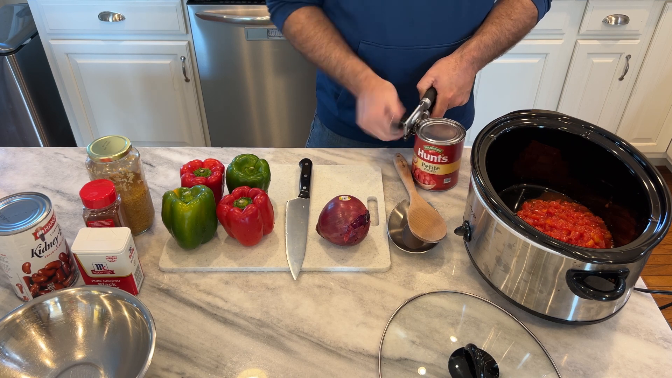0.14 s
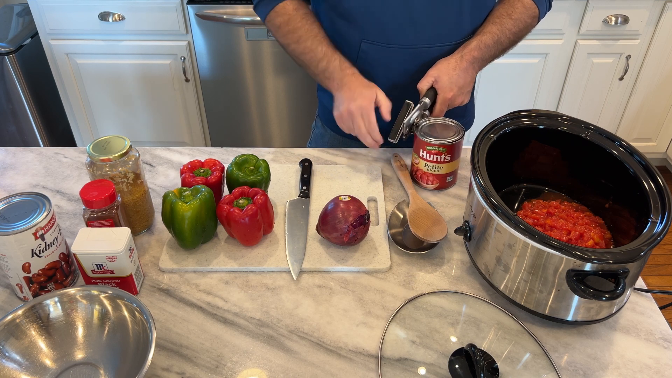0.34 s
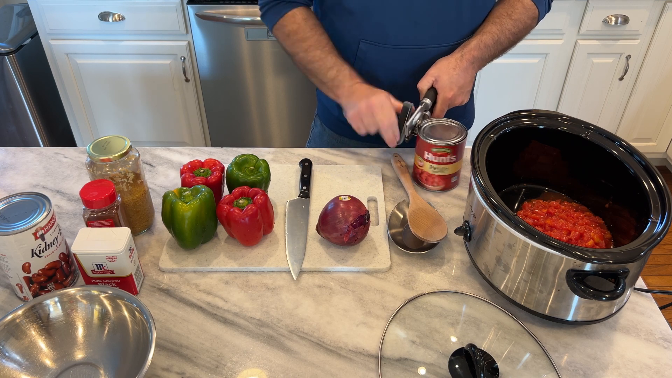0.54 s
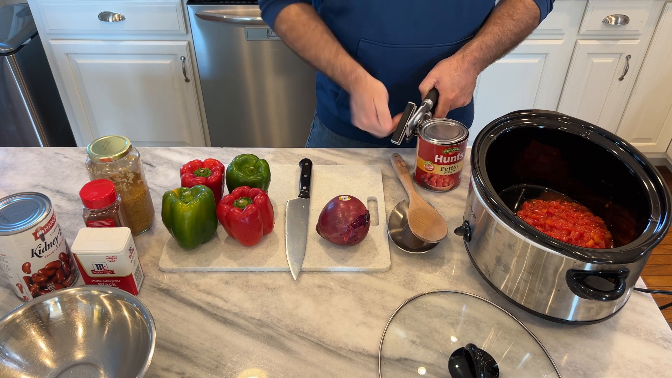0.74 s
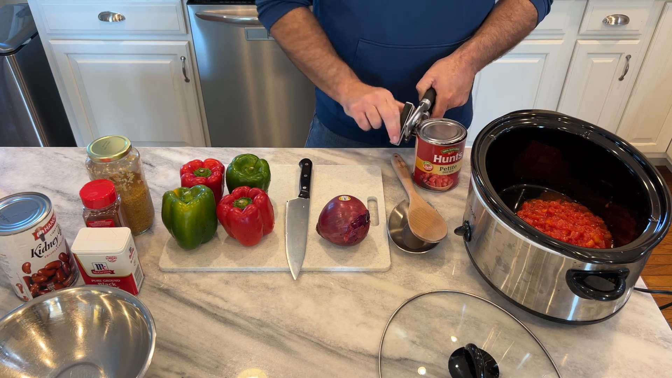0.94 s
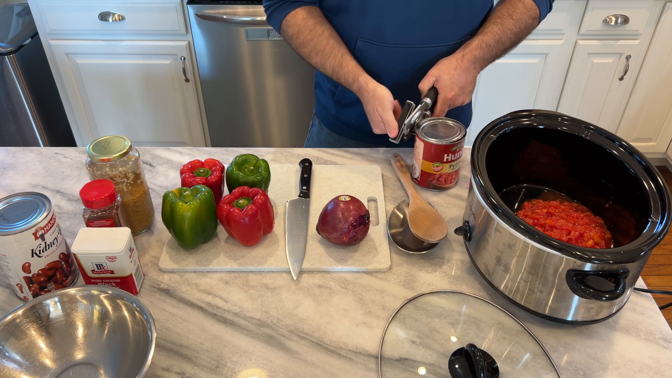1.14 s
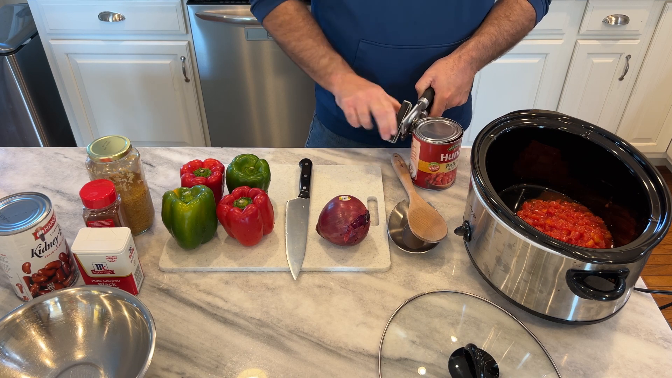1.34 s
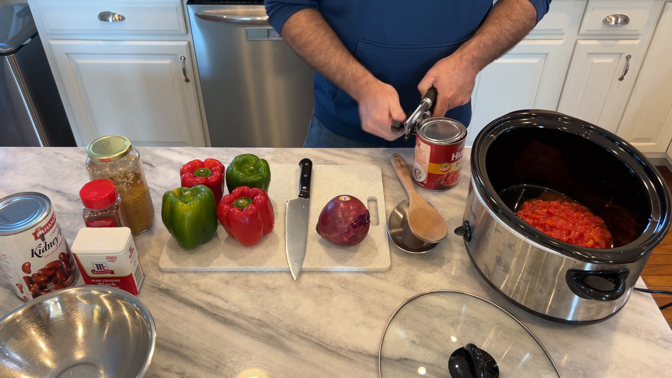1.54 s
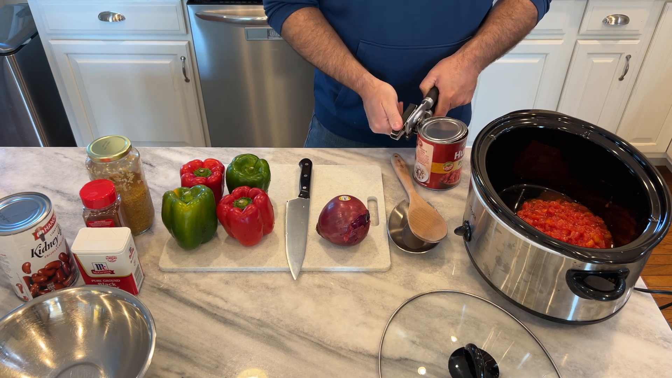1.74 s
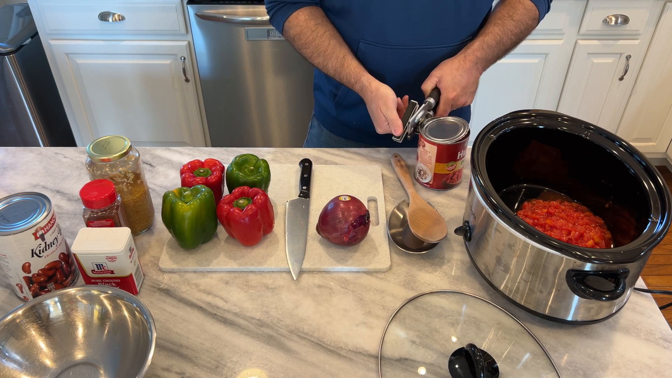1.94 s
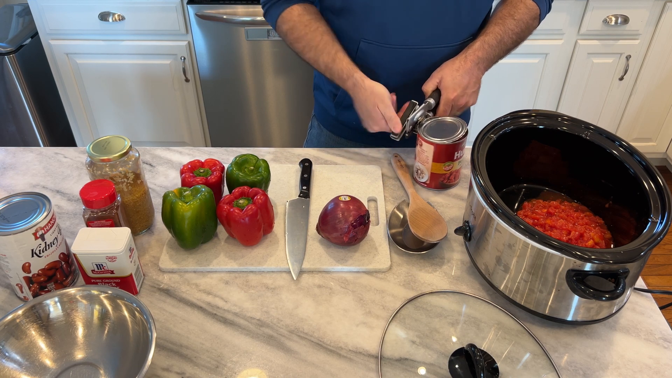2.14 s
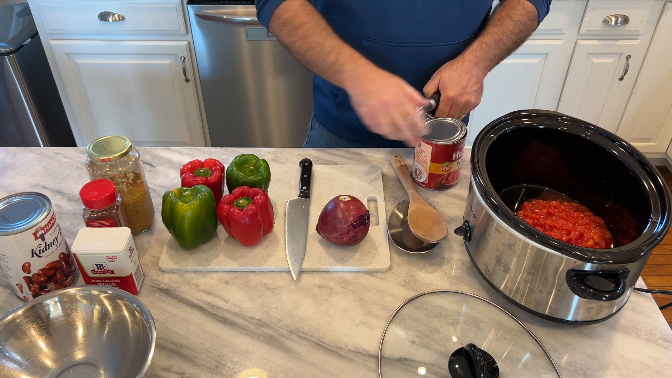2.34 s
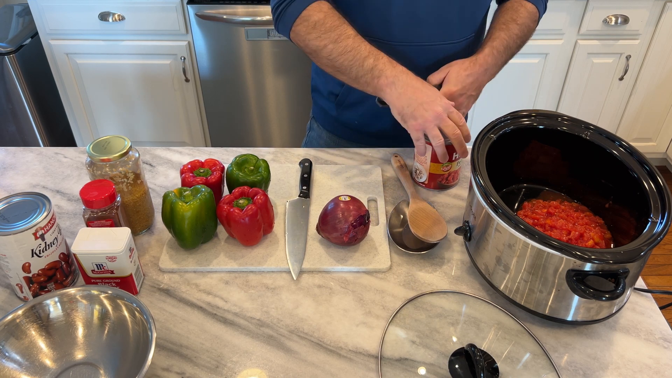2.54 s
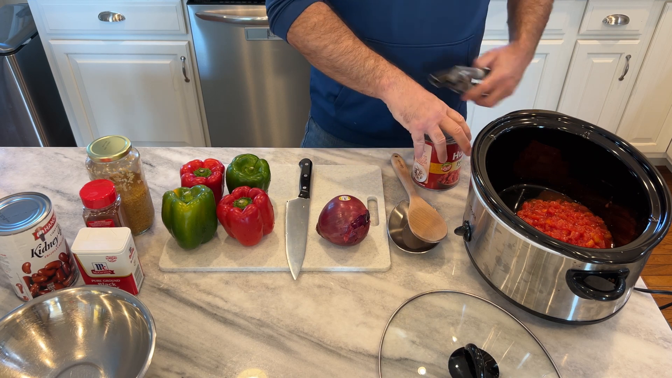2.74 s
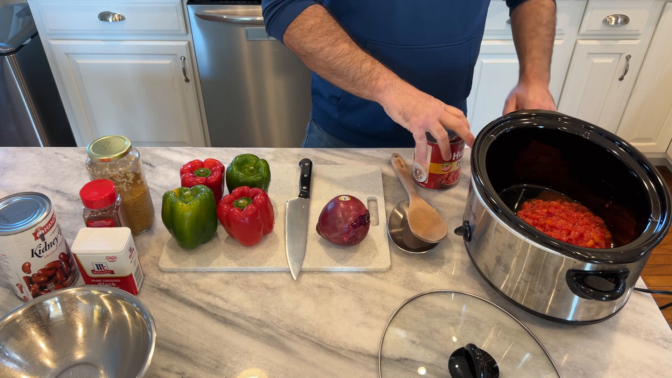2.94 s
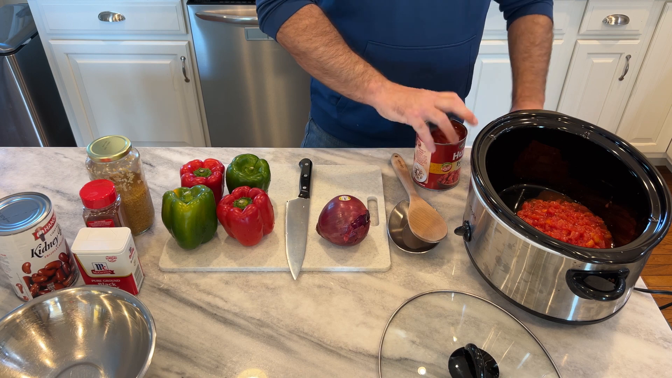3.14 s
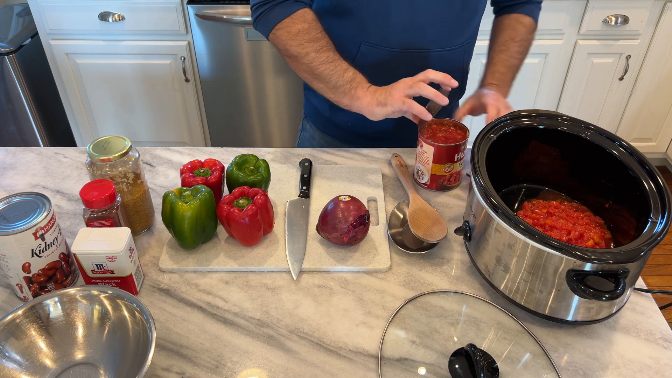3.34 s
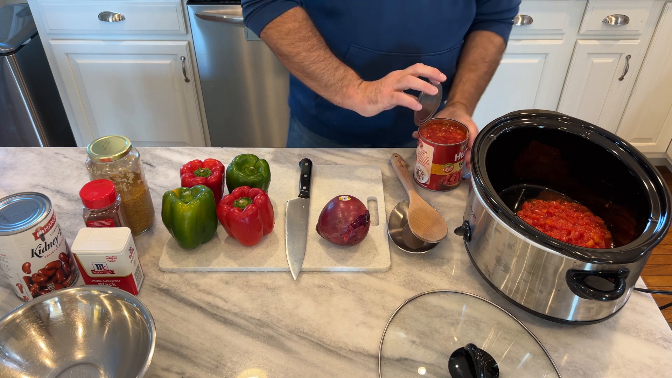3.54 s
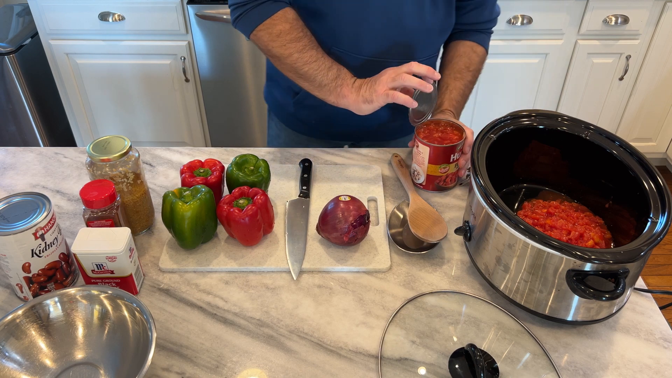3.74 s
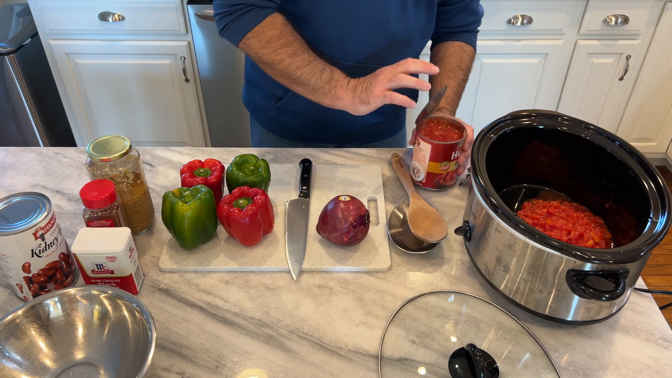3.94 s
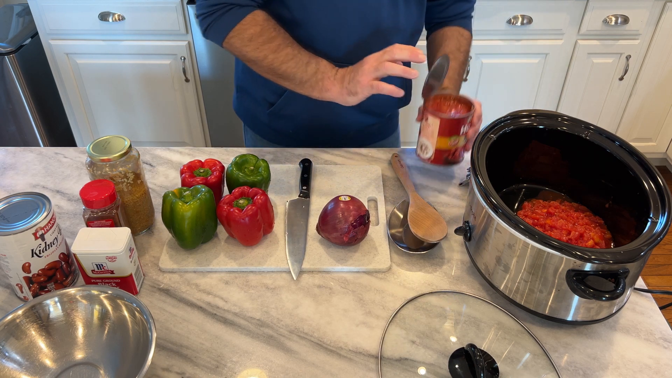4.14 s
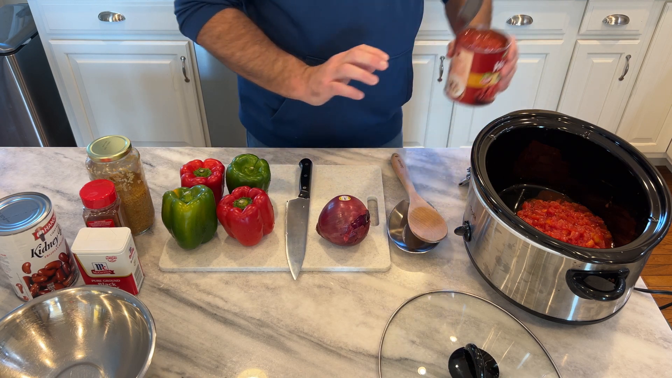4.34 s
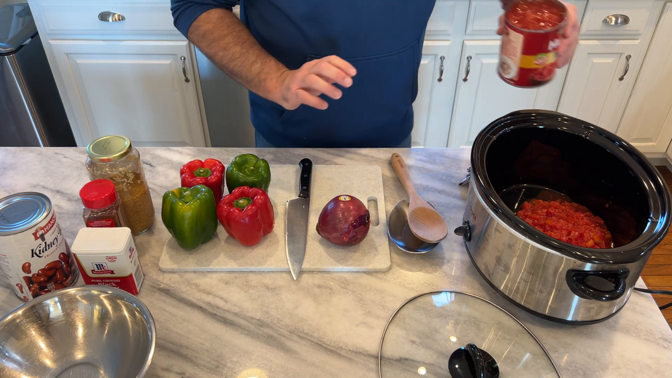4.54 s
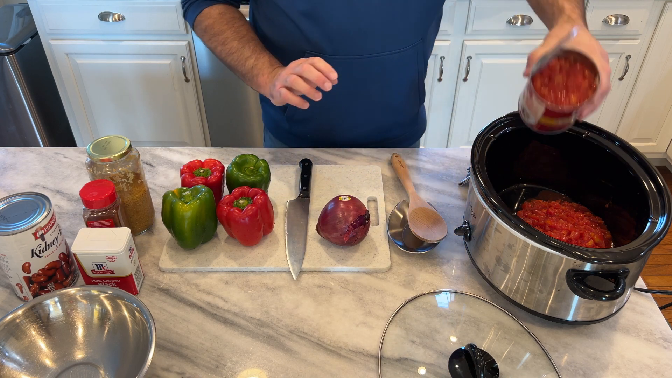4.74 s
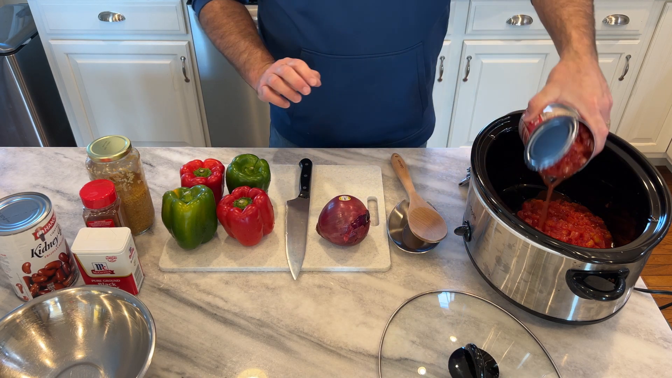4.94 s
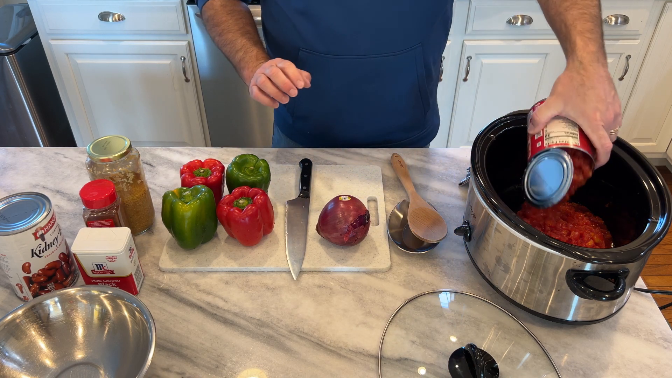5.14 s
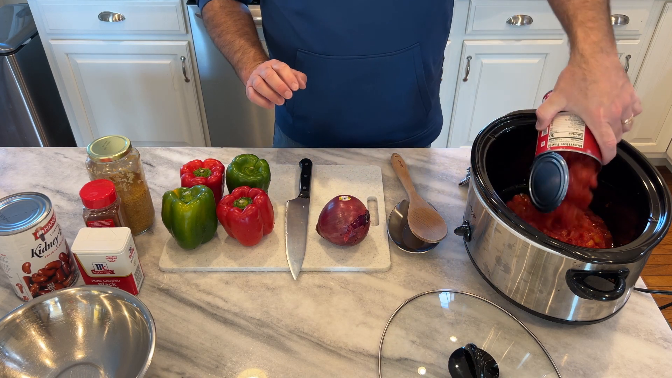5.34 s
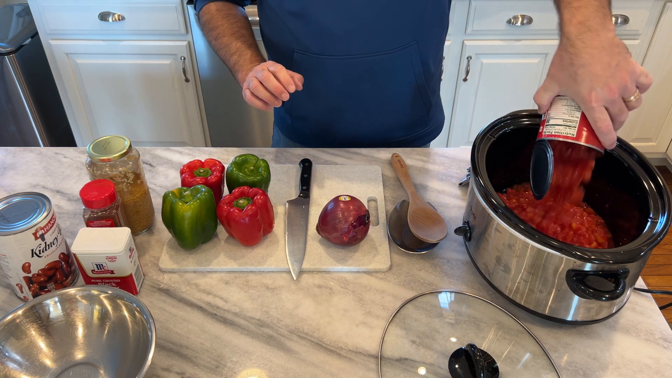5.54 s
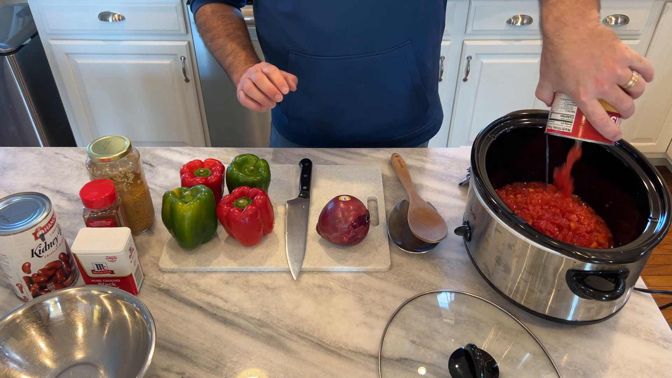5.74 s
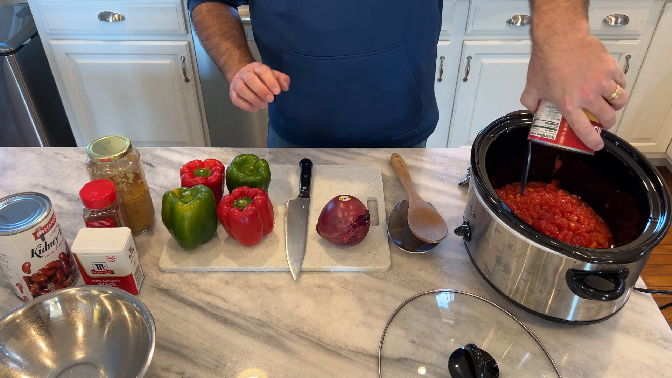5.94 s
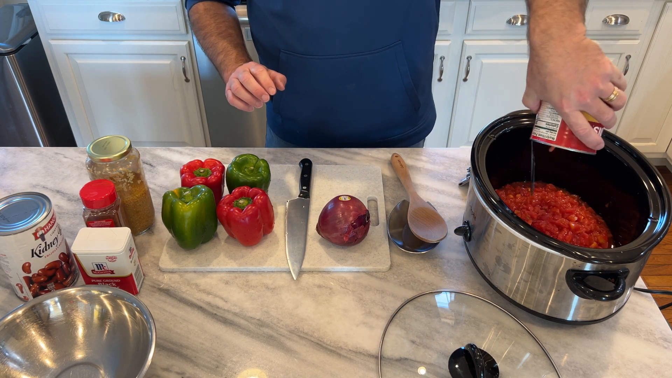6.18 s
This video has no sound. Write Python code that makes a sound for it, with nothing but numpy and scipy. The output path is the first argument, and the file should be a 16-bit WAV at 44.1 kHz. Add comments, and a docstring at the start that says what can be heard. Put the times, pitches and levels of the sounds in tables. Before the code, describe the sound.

Close in a hard, echoing kitchen, a manual opener bites around a full steel can about every half second, with short dull metallic clanks, scrapes and counter thuds. After a last sharp knock and a brief pause, the tool clatters onto stone. A dull drawer-like knock follows, then a low rolling rumble. Finally diced tomatoes plop and slop wetly into a pot, over faint room tone.

```python
"""Metallic bites and scrapes come first: a hand-crank opener bites four times round a full steel can's lid.
The opener clatters down, a drawer-like knock and low rumble follow, then diced tomatoes slop into a pot.
Dying sines make the metal and counter, random clicks the scraping and wet fizz, filtered noise the rest.
A hard kitchen rings for about half a second; two close microphone ports hear it."""
import sys
import numpy as np
from scipy import signal
from scipy.fft import rfft, irfft, next_fast_len
from scipy.io import wavfile
from scipy.ndimage import uniform_filter1d

SR = 44100
rng = np.random.default_rng(int(sys.argv[2]) if len(sys.argv) > 2 else 0)


def bounce(signal):
    """Save signal as a 16-bit WAV file at the path given by the first command-line argument."""
    frames = np.transpose(np.atleast_2d(signal))
    limited = np.clip(frames, -1, 1)
    pcm = np.round(limited * 32767).astype(np.int16)
    wavfile.write(sys.argv[1], SR, pcm)


N = 273861  # length of the scene in samples

# All levels in the tables are relative: the mix, room and ports still shape them.
# Turns of the crank (the first is only the end of one); as the cut grows each favours other can modes:
# start_s, rise_s, hold_s, ring_db, scrape_db, counter_shake_db, favoured_hz, boost_db, second_hz, boost_db
CRANK_TURNS = [(-.06, .02, .05, -58, -59, -52, 1000, 3, 430, 3),
               (0.079, 0.033, 0.048, -31.5, -39.5, -43, 1000, 7, 647, 8.5),
               (.535, .035, 0.045, -33, -43, -42, 2390, 4, 222, 11),
               (.975, .05, 0.051, -32.5, -38, -41.5, 2370, 3, 1030, 9),
               (1.442, 0.024, .06, -43, -47, -44, 1340, 14, 320, 9)]
# Blows: the opener jolts the can, the opener clatters down, a duller knock in three contacts:
# start_s, ring_db, crack_db, thud_db, favoured_hz, brightness (dB per octave)
CAN_JOLTS = [(.036, -36, -52, -43, 740, -2), (.090, -33, -35, -54, 1000, -1),
             (.113, -31.5, -27, -37.5, 1000, -2), (.150, -27, -40, -38.5, 1000, .1),
             (.229, -24, -25, -47.5, 2370, .5), (.250, -28.5, -55, -53, 895, -3),
             (.488, -37, -42, -50, 1020, .1), (.548, -36, -44, -49, 2390, 1.2),
             (.612, -34, -48, -49, 1443, .1), (.915, -36, -43, -47, 970, -1),
             (.998, -36.5, -44, -42, 1330, -1), (1.027, -27, -27, -34.5, 1000, 1),
             (1.049, -28.5, -24, -39, 2320, .3), (1.151, -28, -30, -49.5, 2215, 2),
             (1.397, -35, -48.5, -42.5, 940, -1), (1.460, -36, -50, -58, 1220, .1),
             (1.493, -36, -43.5, -42.5, 1345, -.3), (1.880, -36, -47, -53.5, 1200, -1.5),
             (2.128, -22, -26, -41, 1240, -1.1)]
OPENER_CLATTER = [(2.955, -41, -55, -53.5, 1380, -.6), (3.043, -21, -24, -46.5, 1330, .1),
                  (3.157, -21, -23.5, -33.5, 1330, -.6), (3.237, -17.5, -21.5, -39.5, 1000, .3)]
DULL_KNOCK = [(3.627, -34, -43, -49, 690, -1.2), (3.635, -27, -24.5, -50.5, 2300, 1),
              (3.659, -16.5, -17, -38, 640, -1.2)]
# Ways the steel can rings: pitch_hz, level_db, t60_s (time to die by 60 dB)
CAN_MODES = [(223.4, -8, 0.093), (322.8, -10.5, 0.15), (423.6, -3.5, 0.088), (565, -12.5, 0.057),
             (672.5, -4, 0.063), (737, -6, 0.091), (896, 8.5, 0.017), (994, 1, 0.075), (1204, -2, 0.052),
             (1278, -5.5, 0.087), (1345, -12, 0.22), (1441.6, -2.5, 0.07), (1624, -2.5, 0.031),
             (1770, -8, 0.059), (2215, -16, 0.043), (2354, -5, 0.05), (2463, -10, 0.028),
             (2520, -21.5, 0.026), (3390, -16, 0.018)]
# Colour of the wheel on steel: pitch_hz, level_db
SCRAPE_COLOUR = [(880, 4), (1500, -19.5), (2380, -5.5), (5000, -13), (8680, -23.5), (10100, -25),
                 (13100, -17), (15900, -25), (16500, -57)]
# Ways the counter and cupboards thud: pitch_hz, level_db, t60_s
COUNTER_MODES = [(76, -10.5, 0.067), (114.5, 1.5, 0.13), (177.2, -12, 0.3), (211, -9.5, 0.044)]
# Colour of the sharpest edge of a contact: pitch_hz, level_db
CLICK_COLOUR = [(5000, -22), (9000, -5.5), (13000, 1), (16500, -2.5)]
# Swell of a low rolling rumble: start_s, rise_s, hold_s, level_db, fall_db_per_s
RUMBLE_SWELL = (3.72, .3, .83, -53, 130)


def amp(db):
    """Turns decibels into a multiplying factor."""
    return 10 ** (np.asarray(db) / 20)


def evened(x):
    """Scales a sound to an average (RMS) strength of one."""
    return x / np.sqrt(np.mean(x ** 2) + 1e-20)


def read(points, hz):
    """Reads values between (pitch, value) points, spaced by ear: on a log pitch scale."""
    f, value = np.transpose(points)
    return np.interp(np.log(hz + 1), np.log(f + 1), value)


def add(mix, start_s, sound):
    """Adds a sound into the mix at its start time, cut at the end of the scene."""
    part = mix[round(start_s * SR):][:len(sound)]
    part += sound[:len(part)]


def coloured(x, points):
    """Makes some pitches stronger than others: weights the spectrum by (Hz, dB) points."""
    size = next_fast_len(x.shape[-1])
    weight = amp(read(points, np.fft.rfftfreq(size, 1 / SR)))
    return irfft(rfft(x, size) * weight, size)[..., :x.shape[-1]]


def whitened(x):
    """Makes all pitches equally strong, keeping only their timing (phase)."""
    return irfft(np.exp(1j * np.angle(rfft(x))), len(x))


def swell(start_s, rise_s, hold_s, level_db, fall_db_per_s):
    """Gain over the whole scene: rises, holds, then dies away."""
    t = np.arange(N) / SR - start_s
    fall_db = fall_db_per_s * np.maximum(t - rise_s - hold_s, 0)
    return np.clip(t / rise_s, 0, 1) ** 2 * amp(level_db - fall_db)


def ring(modes, favoured=(), slope_db=0., scatter=0., rise_s=0.0012):
    """A struck object: dying sines, three to a mode; favoured lifts nearby modes, slope tilts per octave."""
    t, out = np.arange(SR // 4) / SR, 0
    detune = 1 + scatter * rng.standard_normal((len(modes), 3, 1))
    for (hz, db, t60_s), d in zip(modes, detune):
        lift_db = sum(b * np.exp(-(np.log2(hz / f) / 0.065) ** 2) for f, b in favoured)
        level_db = db + lift_db + slope_db * np.log2(hz / 1000)
        sines = np.sin(2 * np.pi * hz * d * t).sum(0)
        out = out + amp(level_db - 60 * t / t60_s) * sines
    out = out * (1 - np.exp(-t / rise_s))
    return out / abs(out).max()


def burst(points, fade_s):
    """A short contact: a puff of noise, even in colour before points shape it, that dies at once."""
    t = np.arange(SR // 10) / SR
    puff = rng.standard_normal(len(t)) * amp(-60 * t / fade_s)
    shaped = coloured(whitened(puff), points) * amp(-20 * t / fade_s)
    strength = np.sqrt(np.mean(amp(-120 * t / fade_s)))  # shorter puffs carry less energy
    return evened(shaped) * strength * (1 - np.exp(-t / 0.0003))


def slips(size, per_s, spread_db):
    """Sudden slips: uneven clicks at random times, a few of them large."""
    big = amp(spread_db * np.minimum(rng.exponential(1, size), 4))
    return big * rng.choice([-1, 1], size) * (rng.random(size) < per_s / SR)


def in_peaks(x, peaks):
    """Noise through fixed resonances, each passed twice for steep flanks."""
    out = 0
    for hz, width_hz, db in peaks:
        b, a = signal.iirpeak(hz, hz / width_hz, SR)
        once = signal.lfilter(b, a, x)
        out = out + amp(db) * evened(signal.lfilter(b, a, once))
    return evened(out)


def blows(rows, modes, crack, crack_fade_s, chatter_fade_s, scatter, click_db):
    """Each blow chatters briefly into the object's modes, cracks and clicks, and thuds in the counter."""
    click_per_brightness = 2.5  # brighter blows click harder: dB per unit of brightness
    out, t = np.zeros(N), np.arange(SR // 20) / SR
    for start_s, ring_db, crack_db, thud_db, favoured_hz, slope_db in rows:
        chatter = rng.standard_normal(len(t)) * amp(-60 * t / chatter_fade_s)
        chatter = irfft(np.exp(1j * np.angle(rfft(chatter))), len(t))[:len(t) // 2]  # the modes set the tone
        body = signal.fftconvolve(chatter, ring(modes, [(favoured_hz, 6.5)], slope_db, scatter))
        edge_db = crack_db + click_db + click_per_brightness * slope_db
        add(out, start_s, amp(ring_db) * body / abs(body).max())
        add(out, start_s, amp(crack_db) * burst(crack, crack_fade_s))
        add(out, start_s, amp(thud_db) * ring(COUNTER_MODES, rise_s=.005))
        add(out, start_s, amp(edge_db) * burst(CLICK_COLOUR, fade_s=0.0097))
    return out


def pips(rows, glide, fuzz, t60_at_1k_s, rise_s):
    """Short tones that may rise like a closing bubble, with a noisy skirt and perhaps a click."""
    skirt_ratio, skirt_edge_db = 1.6, -16  # pitch ratio from the tone to each edge of the skirt
    out, t = np.zeros(N), np.arange(SR // 10) / SR
    for start_s, level_db, hz, *click_db in rows:
        t60_s = t60_at_1k_s * (1000 / hz) ** .45  # smaller things ring higher and shorter
        tone = np.sin(2 * np.pi * hz * (t + glide * t ** 2)) * amp(-60 * t / t60_s)
        skirt_colour = [(hz / skirt_ratio, skirt_edge_db), (hz, 0), (hz * skirt_ratio, skirt_edge_db),
                        (hz * 4, -22)]
        skirt = burst(skirt_colour, t60_s)
        roughness = fuzz * np.clip(hz / 2400, .6, 1.3)  # low ones are rounder
        add(out, start_s, amp(level_db) * (1 - np.exp(-t / rise_s)) * (tone + roughness * skirt))
        for edge_db in click_db:
            add(out, start_s, amp(edge_db) * burst(CLICK_COLOUR, fade_s=.012))
    return out


def crank():
    """The toothed wheel slips along the rim: clicks ring the can, scrape, and shake the counter."""
    ring_fall, scrape_fall, shake_fall = 300, 499.5, 150  # dB per second
    shake_lag_s = 0.026  # the counter builds up more slowly
    out = np.zeros(N)
    teeth = evened(slips(N, per_s=200, spread_db=4))
    fine_slips = evened(slips(N, per_s=2200, spread_db=6.5))
    grit = evened(coloured(fine_slips + 0.3 * teeth, SCRAPE_COLOUR))
    for start_s, rise_s, hold_s, ring_db, scrape_db, shake_db, *favoured in CRANK_TURNS:
        effort = swell(start_s, rise_s, hold_s, ring_db, ring_fall)
        scrape = swell(start_s, rise_s, hold_s, scrape_db, scrape_fall)
        shake = swell(start_s, rise_s + shake_lag_s, hold_s, shake_db, shake_fall)
        can = ring(CAN_MODES, np.reshape(favoured, (2, 2)), scatter=0.011)
        counter = ring(COUNTER_MODES)
        out += signal.oaconvolve(effort * teeth, can / np.linalg.norm(can))[:N]
        out += scrape * grit
        out += signal.oaconvolve(shake * teeth, counter / np.linalg.norm(counter))[:N]
    return out


def jolts():
    """The opener jolts the can, which rings in its own modes."""
    return blows(CAN_JOLTS, CAN_MODES, SCRAPE_COLOUR, crack_fade_s=.012, chatter_fade_s=.015,
                 scatter=.015, click_db=-15)


def opener(noise):
    """The opener drags off the rim, clatters onto stone and brushes the lid: blows and resonant noise."""
    # Ways the opener rings: pitch_hz, level_db, t60_s
    tool_modes = [(204.1, -9.5, 0.054), (410, -7, 0.024), (754, -1.5, 0.036), (987, 0, 0.03),
                  (1260, 1, 0.024), (1370, -3, 0.024), (2350, -12, 0.02), (2770, -13, 0.02),
                  (3290, -11, .015), (4250, -12, .012), (5310, -12, .012), (6040, -5, .018),
                  (6680, -5, .018)]
    # Colour of metal on stone: pitch_hz, level_db
    stone_crack = [(290, -41.5), (500, -1.5), (1120, -21), (1310, 2), (1760, -6.5), (6100, -14.5),
                   (8930, -21), (10200, -38.5), (13400, -14.5), (16500, -56.5)]
    # The cut lid is brushed and sings: start_s, rise_s, hold_s, level_db, fall_db_per_s
    brush_swell = (2.964, 0.008, .02, -45, 700)
    # Resonances of the lid: pitch_hz, width_hz (of one pass), level_db
    lid_peaks = [(1000, 200, -4), (1370, 200, 0), (2080, 200, -8), (2710, 220, 4.5), (3550, 200, -9),
                 (4500, 2500, -8), (6760, 250, -6), (8550, 250, -6), (11000, 400, -6.5),
                 (13100, 600, -12.5)]
    # The opener drags off the rim and rings: start_s, rise_s, hold_s, level_db, fall_db_per_s
    drag_swell = (2.818, .002, .018, -49.5, 600)
    # Resonances of the dragged opener: pitch_hz, width_hz (of one pass), level_db
    jaw_peaks = [(1460, 350, 1), (3020, 400, 3.5), (3670, 450, -6), (4290, 550, -6), (5820, 400, -5),
                 (3000, 5000, 5)]
    clatter = blows(OPENER_CLATTER, tool_modes, stone_crack, crack_fade_s=0.055, chatter_fade_s=0.02,
                    scatter=0.03, click_db=-13)
    brush = swell(*brush_swell) * in_peaks(noise, lid_peaks)
    drag = swell(*drag_swell) * in_peaks(noise, jaw_peaks)
    return clatter + brush + drag


def knock():
    """A dull drawer-like knock: three contacts ring low, quickly dying modes."""
    # Ways the knocked object rings: pitch_hz, level_db, t60_s
    panel_modes = [(175, -13.5, 0.12), (315, -4, 0.15), (360, 1.5, 0.046), (416, -4, 0.031),
                   (557, 1, 0.064), (646, -0.5, 0.048), (690, 1, 0.029), (925, -7, 0.016),
                   (1428, -6, 0.014), (2300, -12, 0.015)]
    # Colour of the contact: pitch_hz, level_db
    snap_colour = [(290, -55), (500, -8.5), (710, -25.5), (1150, -5), (1480, -13), (6960, -21),
                   (10200, -27), (13200, -20), (16500, -38)]
    return blows(DULL_KNOCK, panel_modes, snap_colour, crack_fade_s=0.029, chatter_fade_s=0.0091,
                 scatter=0.03, click_db=3)


def blips(per_s, low_hz, high_hz):
    """Many small bubbles in the pulp: short rising tones at random."""
    t, out = np.arange(600) / SR, np.zeros(N)
    for hz in np.geomspace(low_hz, high_hz, 12):
        bubble = np.sin(2 * np.pi * hz * (t + 12 * t ** 2)) * np.exp(-t * hz / 7)
        out += signal.oaconvolve(slips(N, per_s / 12, spread_db=3), bubble)[:N]
    return evened(out)


def tomatoes(noise):
    """Chunks plop into the pot and air gulps into the can as rising tones, over wet fizz and bubbles."""
    # Chunks and drops land in the pot: start_s, level_db, pitch_hz, click_db
    plop_rows = [(4.929, -61.5, 5600, -67), (4.945, -55.5, 5800, -70), (5.062, -64, 6020, -43),
                 (5.085, -68.5, 3800, -65), (5.100, -58, 1950, -70), (5.113, -53, 1296, -52),
                 (5.116, -51, 1920, -65), (5.150, -58, 3450, -70), (5.184, -54, 2730, -42.5),
                 (5.240, -48, 2300, -41), (5.245, -48, 4400, -46), (5.265, -56, 4270, -40),
                 (5.317, -48, 1940, -62), (5.319, -54, 1350, -70), (5.322, -54, 2400, -70),
                 (5.359, -54, 2040, -65), (5.390, -50.5, 2830, -47), (5.420, -44.5, 1756, -61),
                 (5.421, -51, 1350, -70), (5.452, -52, 1300, -70), (5.500, -49, 1900, -65),
                 (5.551, -55, 2800, -65), (5.445, -45, 1900, -46), (5.493, -45, 2410, -39),
                 (5.555, -52, 1820, -65), (5.592, -35.5, 1260, -51), (5.594, -41, 2290, -53),
                 (5.595, -45, 3000, -60), (5.604, -45, 1900, -65), (5.630, -47, 1970, -43),
                 (5.740, -55.5, 3480, -65.5), (5.768, -48.5, 3350, -43), (5.974, -60.5, 5370, -49),
                 (6.018, -66.5, 6180, -56)]
    # Air gulps into the can: start_s, level_db, pitch_hz
    gulp_rows = [(5.365, -48.5, 466), (5.38, -50.5, 760), (5.41, -50.5, 460), (5.46, -49.5, 554),
                 (5.595, -51, 744), (5.68, -52.5, 504), (5.715, -54, 520)]
    # Strength of the wet flow over time: time_s, level_db
    flow_points = [(5.07, -79), (5.094, -66), (5.29, -62.5), (5.55, -66), (5.628, -56), (5.694, -72),
                   (5.846, -80), (6.05, -103)]
    # Colour of the wet fizz: pitch_hz, level_db
    fizz_colour = [(180, -36), (300, -8), (1130, -8), (2440, -11.5), (7020, -5.5), (10100, -27),
                   (14000, -8), (15700, -14), (16500, -41)]
    clumps = amp(6 * np.clip(evened(uniform_filter1d(noise, 700)), -2, 1.5))  # slow uneven strength
    fizz = evened(coloured(clumps * slips(N, per_s=3700, spread_db=7.5), fizz_colour))
    flow = amp(np.interp(np.arange(N) / SR, *np.transpose(flow_points), left=-200))
    plops = pips(plop_rows, glide=2.5, fuzz=1.1, t60_at_1k_s=.07, rise_s=.0008)
    gulps = pips(gulp_rows, glide=1.8, fuzz=1.8, t60_at_1k_s=.055, rise_s=.004)
    return plops + gulps + flow * (fizz + 0.5 * blips(per_s=140, low_hz=1280, high_hz=5060))


def small_sounds(noise):
    """Ticks are short pips; a rustle and a faint whisper over the rumble are high filtered noise."""
    # Small ticks of fingers and metal: start_s, level_db, pitch_hz, click_db
    tick_rows = [(1.777, -64, 2920, -73), (1.797, -63, 2800, -78), (2.377, -56, 3040, -68),
                 (2.392, -56.5, 2770, -63), (2.556, -59.5, 2005, -68), (2.733, -63.5, 6700, -75),
                 (2.810, -56.5, 1500, -53), (3.470, -78, 5800, -58), (3.889, -56, 13200, -60)]
    # A short high rustle: start_s, rise_s, hold_s, level_db, fall_db_per_s
    rustle_swell = (3.5, 0.1, 0.08, -70, 600)
    ticks = pips(tick_rows, glide=0., fuzz=0.8, t60_at_1k_s=.03, rise_s=.0005)
    hiss = evened(coloured(noise, [(5000, -36.5), (12000, -4.5), (16000, -2.5)]))
    whisper = amp(-41) * swell(*RUMBLE_SWELL)  # 41 dB below the rumble's swell
    return ticks + (swell(*rustle_swell) + whisper) * hiss


def rumble(noise):
    """A low rolling rumble: noise through fixed low resonances."""
    # Resonances of the rumble: pitch_hz, width_hz (of one pass), level_db
    rumble_peaks = [(216, 57, 12.5), (320, 49, 3), (436.4, 28, 1), (529, 122, 8), (710, 120, -4),
                    (940, 146, -6), (1560, 430, -35)]
    return swell(*RUMBLE_SWELL) * in_peaks(noise, rumble_peaks)


def counter_hum(noise):
    """Each shake and thud leaves the counter humming in deep resonances; between them a quiet hum stays."""
    # Resonances of the hum: pitch_hz, width_hz (of one pass), level_db
    hum_peaks = [(80.75, 6, -1.5), (116.3, 17.3, -2.5)]
    shake_db, thud_db, rest_db = -1, -9, -62.5  # the first two are against the shake and the thud
    rise_s, fall_db_per_s = .06, 60
    kicks = [(row[0] + row[1], row[5] + shake_db) for row in CRANK_TURNS]
    kicks += [(row[0], row[3] + thud_db) for row in CAN_JOLTS + OPENER_CLATTER + DULL_KNOCK]
    power = amp(rest_db) ** 2
    power = power + sum(swell(start_s, rise_s, 0, db, fall_db_per_s) ** 2 for start_s, db in kicks)
    return np.sqrt(power) * in_peaks(noise, hum_peaks)


def room_tone(air_noise, drone_noise):
    """Steady background: softly coloured noise, with a deep drone from narrow resonances."""
    # Colour of the room tone: pitch_hz, level_db
    air_colour = [(12, -39), (20, -7.5), (124, -2), (251, -4), (583, -13.5), (1390, -32), (1690, -28),
                  (2310, -35.5), (5830, -46), (8170, -49), (10200, -65.5), (13600, -38), (16500, -69)]
    # Resonances of the steady deep drone: pitch_hz, width_hz (of one pass), level_db
    drone_peaks = [(56.6, 8.6, -2.5), (40, 20, -12.5)]
    air = amp(-61) * evened(coloured(air_noise, air_colour))
    return air + amp(-64) * in_peaks(drone_noise, drone_peaks)


def kitchen(x):
    """Hard-room echoes: sparse random taps, each band dying at its own speed, for sum and difference."""
    # How long the room rings: pitch_hz, t60_s
    room_t60 = [(60, 0.2), (250, 0.59), (1000, 0.56), (3000, 0.54), (6000, 0.61), (12000, 0.23)]
    early_db, early_t60_s = -1, 0.12  # counter and cupboards close by throw strong first echoes
    out = np.zeros((2, N))
    for k in range(3):  # three random echo tails blend in turn, evening out the room's colour
        taps = np.zeros((2, SR))
        at = np.arange(120, SR - 20, 20) + rng.integers(0, 20, (2, (SR - 121) // 20))
        np.put_along_axis(taps, at, rng.choice([-1., 1.], at.shape), 1)
        hz, t, z = signal.stft(taps, SR, nperseg=256)
        decay = amp(-60 * t / read(room_t60, hz)[:, None]) + amp(early_db - 60 * t / early_t60_s)
        tail = signal.istft(z * decay, SR, nperseg=256)[1]
        blend = np.cos(2 * np.pi * (2.3 * np.arange(N) / SR + k / 3))  # 2.3 cycles per second
        share = np.sqrt(2 / 3) * blend
        out += signal.fftconvolve((share * x)[None], tail / np.linalg.norm(tail[0]), axes=1)[:, :N]
    return out


def scene():
    """The sum and the difference of the two ports, turned into left and right."""
    noise = rng.standard_normal((8, N))
    can = crank() + jolts()
    tool = opener(noise[0])
    dull_knock = knock()
    pour = tomatoes(noise[1])
    small = small_sounds(noise[2])
    near = amp(-1) * (can + tool + dull_knock + small + pour)
    wet = amp(-1.5) * (can + tool) + amp(-0.5) * dull_knock + amp(-3.5) * small + amp(-5.0) * pour
    far = rumble(noise[3:5]) + counter_hum(noise[5:7])
    air = room_tone(noise[[7, 0]], noise[[1, 2]])
    # a time gap between the ports turns the difference a quarter cycle
    quarter_turn = signal.hilbert(near, next_fast_len(N)).imag[:N]
    direct = np.array([near, 0.48 * quarter_turn])
    total, difference = direct + kitchen(wet) + far + air
    return np.array([total + difference, total - difference])


def record(dry):
    """Close ports: bass alike in both, a cancelling band near 10 kHz, a treble lean left, a band limit."""
    # Colour of what the two ports share: pitch_hz, level_db
    sum_colour = [(25, -22), (45, 0), (70, -3.5), (8000, 1), (9300, -0.5), (10200, -18), (11200, 0),
                  (12500, 1), (16500, -4.5)]
    # Colour of what differs between the ports: pitch_hz, level_db
    difference_colour = [(25, -43), (60, -25.5), (160, -13), (400, -6), (800, -.6), (4000, -1.5), (8000, 2),
                         (11000, 8.5), (12500, -6), (14500, -9.5), (16000, -8.5)]
    # Left against right: pitch_hz, level_db
    left_lean = [(60, -1), (450, -0.5), (1500, 0.5), (3300, 2.5), (5500, 7.5), (9000, -0.5)]
    total = coloured((dry[0] + dry[1]) / 2, sum_colour)
    difference = coloured((dry[0] - dry[1]) / 2, difference_colour)
    # each side takes half of the lean
    left = coloured(total + difference, np.array(left_lean) * [1, .5])
    right = coloured(total - difference, np.array(left_lean) * [1, -.5])
    low_pass = signal.firwin(511, 16750, window=("kaiser", 9), fs=SR)  # cuts above 16750 Hz
    return signal.oaconvolve([left, right], low_pass[None], "same")


dry = scene()
out = record(dry)
bounce(out)
```